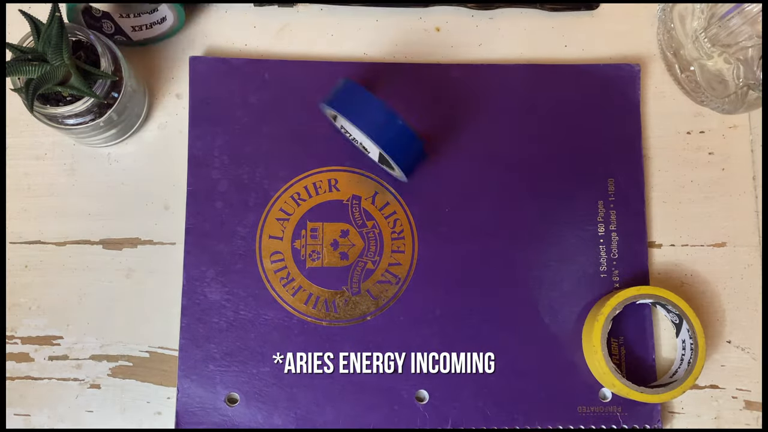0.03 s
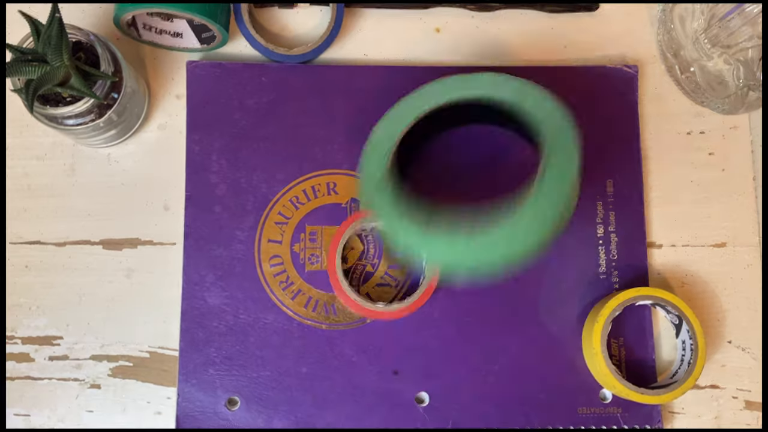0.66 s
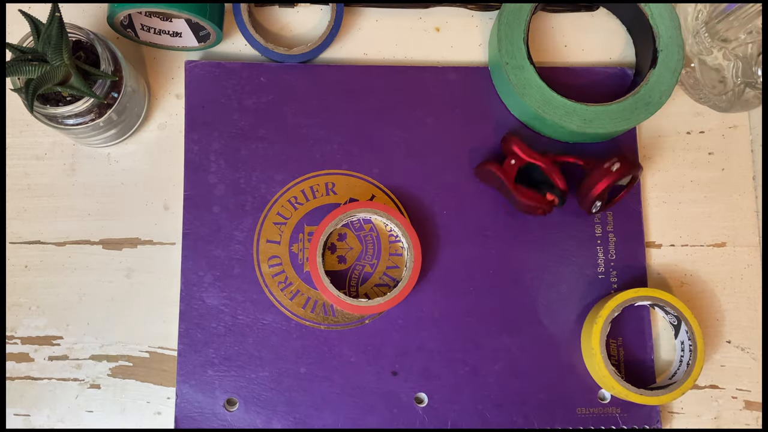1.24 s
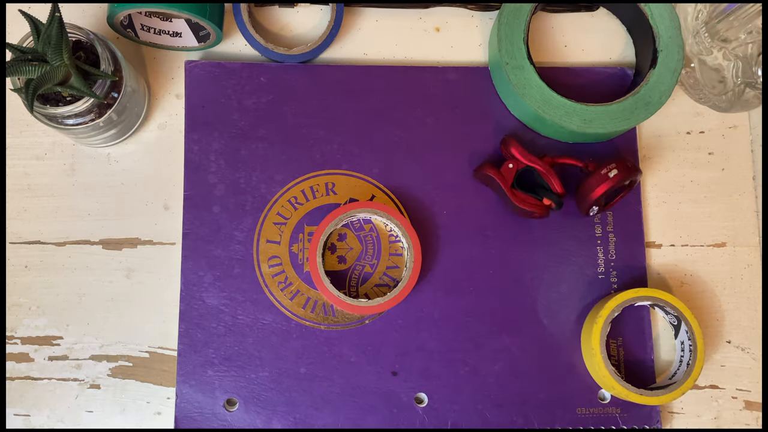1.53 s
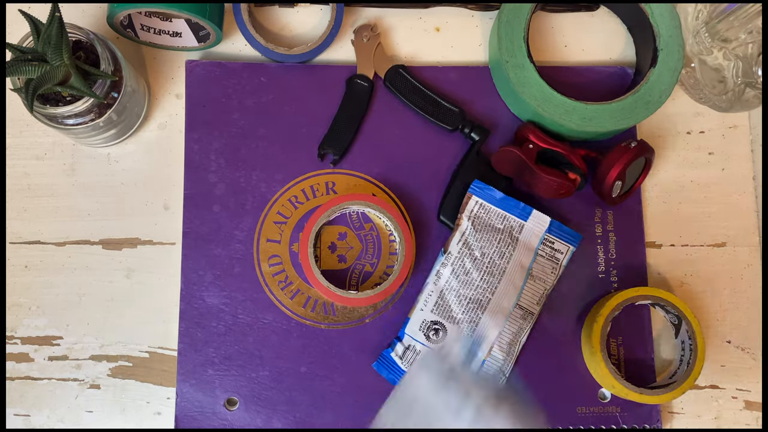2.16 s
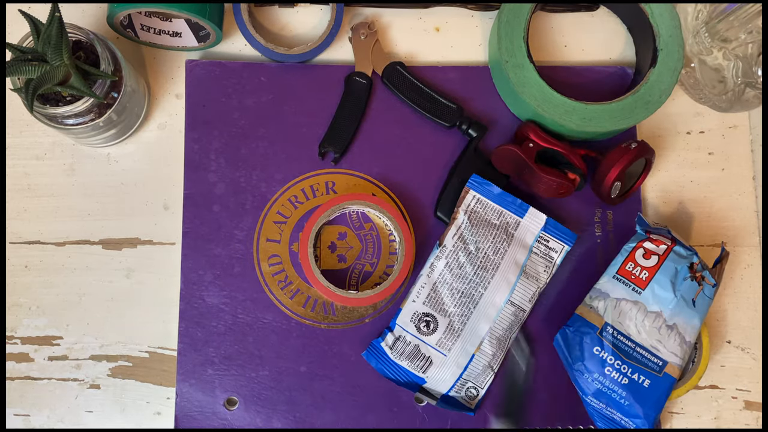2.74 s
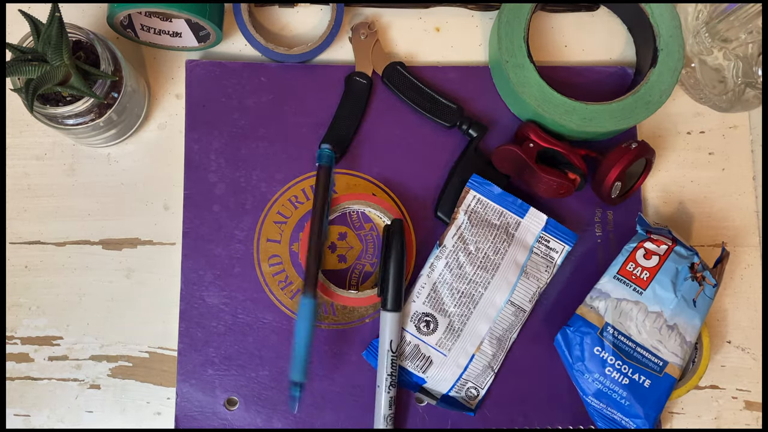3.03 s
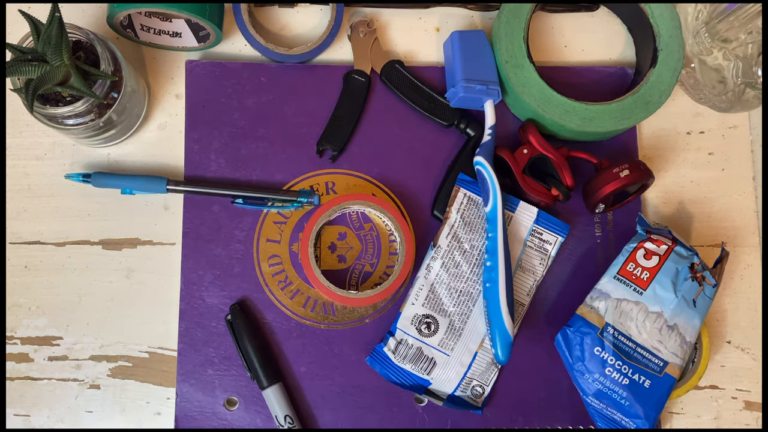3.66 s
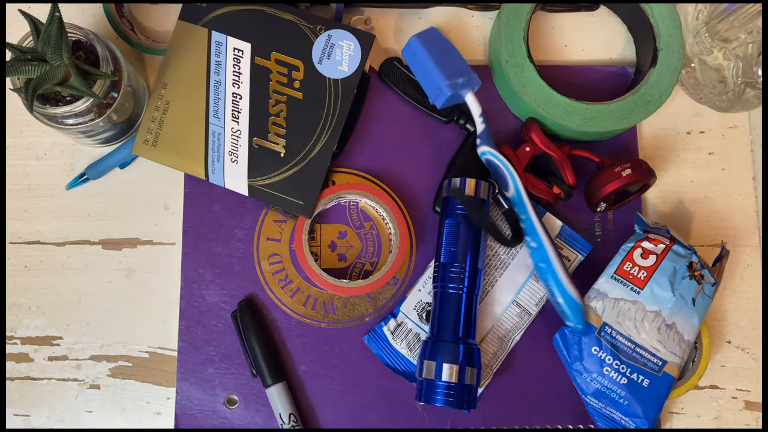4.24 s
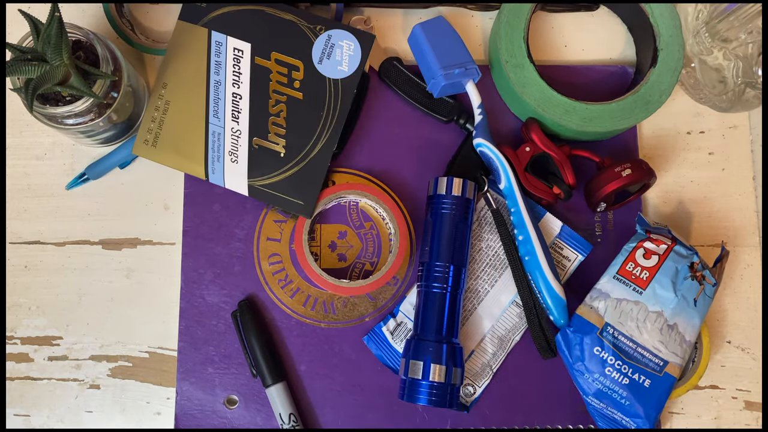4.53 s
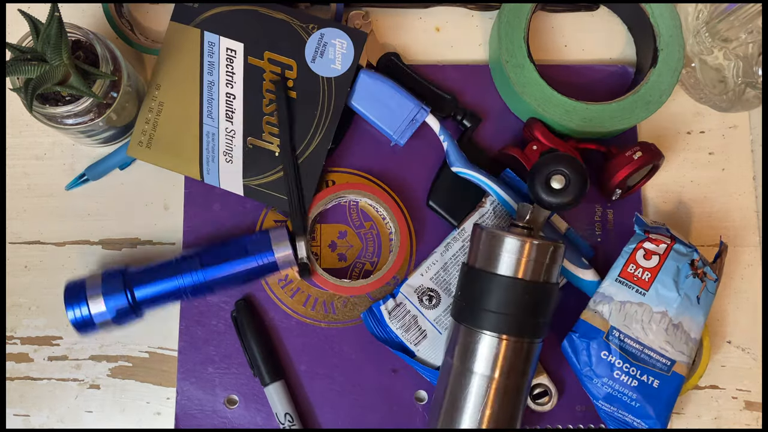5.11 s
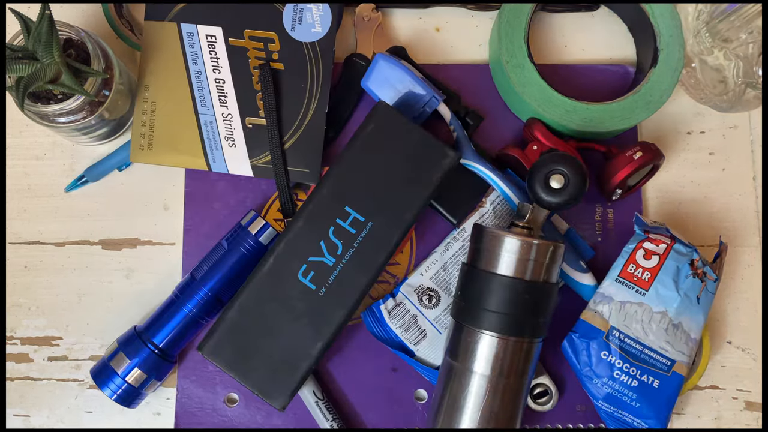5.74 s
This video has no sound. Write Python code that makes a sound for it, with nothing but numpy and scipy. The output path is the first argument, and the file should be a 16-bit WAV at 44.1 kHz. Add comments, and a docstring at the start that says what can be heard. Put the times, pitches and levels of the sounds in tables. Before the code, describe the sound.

Small objects are tossed onto a notebook on a wooden table, two or three each second. Tape rolls thump and bounce first, then a clip clatters, pliers clink and snack packets land with a crinkly slap. Pens click lightly, a flashlight clacks, a steel flask clinks and a box knocks down last. The microphone is close above the table in a small, quiet room.

```python
"""Small objects tossed onto a table

Tape rolls, a clip, pliers, snack packets, pens, a torch, a flask and boxes land one by one on a notebook
on a wooden table. Each landing thumps the tabletop and gives a short clatter, coloured by wood and
object. The object then bounces and rubs to rest; steel parts ring. Two microphone ports hear it from
just above, in a small quiet room."""
import sys
import numpy as np
from scipy import signal
from scipy.fft import rfft, irfft
from scipy.io import wavfile
from scipy.ndimage import uniform_filter1d

SR = 44100
rng = np.random.default_rng(int(sys.argv[2]) if len(sys.argv) > 2 else 0)


def persist_wave(psi):
    """Save psi, clipped to +-1, as 16-bit WAV."""
    counts = np.round(np.clip(psi, -1, 1) * 32767).astype(np.int16)
    wavfile.write(sys.argv[1], SR, np.atleast_2d(counts).T)


N = 254851
LEAD = int(.06 * SR)   # samples ahead of an event's peak
AGE_S = (np.arange(6 * LEAD) - LEAD) / SR

# Each row: time in s, clatter decay in s, levels in dB of thump, knock, clack, tick, rubbing and
# crackle, settling decay in s.
LANDINGS = [ (0.28, 0.0089, -16.5, -19, -30, -34, -68, -54, 0.17),
            (0.665, 0.01, -11.5, -21.5, -32.5, -43.5, -44, -58, 0.15),
            (0.975, 0.0025, -19, -16, -23.5, -31.5, -44, -56, 0.26),
            (1.263, 0.0085, -20, -14.5, -23.5, -30.5, -44, -47.5, 0.24),
            (1.683, 0.0073, -19, -22.5, -30, -25, -69, -44.5, 0.092),
            (1.919, 0.0094, -15, -23.5, -28.5, -25, -63.5, -31, 0.063),
            (2.217, 0.011, -17, -27, -24, -23, -70, -35, 0.056),
            (2.774, 0.0073, -27, -23, -28.5, -31.5, -46, -48.5, 0.054),
            (3.058, 0.0033, -34.5, -25.5, -26, -29, -52, -117.5, 0.026),
            (3.3, 0.009, -24.5, -31.5, -23.5, -28, -44.5, -46, 0.12),
            (3.641, 0.015, -33, -39, -40, -47, -47.5, -45, 0.05),
            (3.912, 0.0067, -32.5, -26.5, -24, -34, -66, -57.5, 0.047),
            (4.175, 0.0048, -26.5, -17, -20.5, -22, -38, -29.5, 0.052),
            (4.761, 0.0037, -27, -24, -17, -26.5, -43, -60, 0.21),
            (5.264, 0.0083, -14, -15, -32, -36, -50.5, -62.5, 0.15), ]
# Higher resonances of the table. Each row: frequency in Hz, lift in dB.
WOOD_RESONANCES = [(450, 5), (625, 4.5), (745, 6), (935, 6.5), (1260, -1), (1420, 2), (1590, -2.5)]
WOOD_Q = 4
# Knock, clack and tick bands. Each row: low edge in Hz, high edge in Hz.
BAND_EDGES_HZ = [(345, 1795), (1750, 5770), (6200, 13300)]
BANDS = [signal.butter(order, edges_hz, "band", fs=SR, output="sos")
         for order, edges_hz in zip((5, 3, 3), BAND_EDGES_HZ)]


def contacts():
    """Yield each landing and bounce: time and decay in s; deep, upper, knock, clack and tick in dB."""
    # Each row: time in s, clatter decay in s, level in dB, kind of touch.
    bounces = [ (0.003, 0.003, -31.5, "thud"), (0.313, 0.0049, -29.5, "knock"),
               (0.354, 0.0032, -38, "knock"), (0.412, 0.021, -32, "knock"), (0.43, 0.005, -17, "knock"),
               (0.496, 0.014, -45.5, "knock"), (0.656, 0.0013, -30, "thud"), (0.688, 0.0083, -21, "thud"),
               (0.779, 0.01, -24.5, "knock"), (0.796, 0.01, -29, "knock"), (0.846, 0.005, -26, "knock"),
               (0.86, 0.016, -30.5, "knock"), (0.896, 0.0043, -33.5, "knock"), (0.96, 0.011, -37, "clack"),
               (0.996, 0.004, -32, "rattle"), (1.033, 0.017, -27, "clack"), (1.131, 0.0075, -28.5, "clack"),
               (1.168, 0.013, -25.5, "clack"), (1.272, 0.022, -26, "clack"), (1.301, 0.011, -30, "rattle"),
               (1.359, 0.0088, -34, "rattle"), (1.412, 0.0048, -33, "thud"), (1.457, 0.0076, -37, "clack"),
               (1.697, 0.0025, -23.5, "click"), (1.712, 0.028, -32.5, "rattle"),
               (1.766, 0.0044, -30, "rattle"), (1.953, 0.027, -34, "rattle"), (2.082, 0.017, -36, "click"),
               (2.15, 0.0028, -30.5, "click"), (2.204, 0.0048, -21.5, "click"),
               (2.225, 0.0013, -14.5, "click"), (2.292, 0.021, -26, "crease"),
               (2.422, 0.006, -37.5, "crease"), (2.525, 0.037, -42, "thud"),
               (2.545, 0.0013, -39.5, "crease"), (2.665, 0.0097, -54.5, "crease"),
               (2.683, 0.0022, -40.5, "crease"), (2.718, 0.0049, -46.5, "crease"),
               (2.737, 0.0017, -43, "crease"), (2.787, 0.0011, -35, "click"), (2.84, 0.0027, -25, "click"),
               (2.867, 0.0006, -30, "click"), (2.891, 0.013, -42, "clack"), (3.047, 0.0018, -28, "click"),
               (3.198, 0.0011, -35, "clack"), (3.235, 0.0029, -44, "rattle"),
               (3.255, 0.006, -42.5, "clack"), (3.358, 0.0061, -32, "rattle"),
               (3.372, 0.0044, -29, "clack"), (3.392, 0.0017, -36.5, "clack"),
               (3.432, 0.00052, -24, "rattle"), (3.453, 0.0023, -39.5, "clack"),
               (3.647, 0.0063, -29.5, "thud"), (3.958, 0.0023, -28.5, "rattle"),
               (3.982, 0.022, -31, "clack"), (3.989, 0.0012, -19.5, "click"), (4.202, 0.013, -29, "rattle"),
               (4.253, 0.0014, -26, "click"), (4.307, 0.0036, -38, "click"),
               (4.362, 0.00096, -31.5, "crease"), (4.377, 0.0028, -33.5, "click"),
               (4.674, 0.0048, -30.5, "click"), (4.784, 0.028, -35, "rattle"),
               (4.814, 0.00034, -16, "click"), (4.888, 0.0019, -23.5, "crease"),
               (4.901, 0.016, -30, "knock"), (4.912, 0.003, -15.5, "knock"), (4.98, 0.0078, -38, "knock"),
               (5.132, 0.0099, -25, "knock"), (5.155, 0.0061, -14.5, "knock"),
               (5.182, 0.0011, -15, "knock"), (5.296, 0.017, -38, "rattle"), (5.334, 0.0022, -23, "knock"),
               (5.334, 0.0036, -25.5, "thud"), (5.42, 0.0025, -27, "knock"), ]
    # Per kind of touch: thump, knock, clack and tick in dB relative to the bounce.
    touches = { "thud": (-0.5, -7.5, -16, -31.5), "knock": (-12.5, 1, -14.5, -36),
               "clack": (-7.5, 0, -2, -21), "rattle": (-2.5, -2, -3, -5.5),
               "crease": (-30, -10.5, -1.5, -18.5), "click": (-31, -13.5, -0.5, -5), }

    def push_db(decay_s, plain_tap_s=.0064):
        """Longer clatters push the table harder."""
        return 10 * np.log10(decay_s / plain_tap_s)

    for time_s, decay_s, thump_db, knock_db, clack_db, tick_db, *_ in LANDINGS:
        upper_db = knock_db + push_db(decay_s) - 5.5
        yield time_s, decay_s, thump_db, upper_db, knock_db, clack_db, tick_db
    for time_s, decay_s, level_db, touch in bounces:
        thump_db, *clatter_db = level_db + np.array(touches[touch])
        deep_db = thump_db + push_db(decay_s)
        upper_db = deep_db - 2.5
        yield time_s, decay_s, deep_db, upper_db, *clatter_db


def clatter(ripple_db=2, grain_db=4, blur_db=(-16, -15, -17), room_db=-39.5, room_t60_s=.3):
    """Each contact is a grainy run of tiny impacts, coloured by wood and object, with a faint room tail."""
    # Object in play. Each row: start in s, hollow resonances and dips as (frequency in Hz, lift in dB).
    objects = [ (0, [(920, 5.5)]), (.38, [(930, 9.5), (1650, 5)]), (.6, [(920, 2)]), (.95, [(1400, 5.5)]),
               (1.15, [(1410, 12.5), (2490, 15)]), (1.22, [(440, 9), (2035, 2.5)]), (1.6, [(2050, 13)]),
               (1.85, [(4400, 3.5)]), (2.65, [(630, 7)]), (3.0, [(2400, 7)]), (3.25, [(2040, 3.5)]),
               (3.6, [(490, 10), (5350, 21)]), (3.85, [(1420, 8.5)]), (4.1, []), (4.6, [(5150, 8)]),
               (4.74, [(2280, 10)]), (4.8, [(5780, 26.5)]), (4.87, [(480, -7), (1000, 3), (1500, 5.5)]), ]
    out = np.zeros((2, N))
    hz = np.linspace(0, SR / 2, len(AGE_S) // 2 + 1)
    octaves = np.log2(np.clip(hz / 1000, 1, 6))
    # dense small modes of each object
    ripples = [from_db(ripple_db * wobble(len(hz), span=18)) for _ in objects]
    tail = from_db(room_db) * swell(.0013, room_t60_s / np.log(1000))
    for time_s, decay_s, _, _, knock_db, clack_db, tick_db in contacts():
        current = max(sum(start_s <= time_s for start_s, _ in objects) - 1, 0)
        db_per_octave = .27 * (tick_db - knock_db) - 2.5   # soft contacts lose treble
        colour = ripples[current] * from_db(db_per_octave * octaves)
        noise = irfft(rfft(stereo_noise(len(AGE_S), spread=.25)) * colour)
        pulse = swell(.43 * decay_s, decay_s)
        grains = match_energy(pulse * from_db(grain_db * wobble(len(AGE_S), span=20)), pulse)
        weight = np.sqrt(decay_s / .003)
        blur = weight * swell(.0015, .017)
        levels_db = (knock_db, clack_db, tick_db)
        for band, db, soft_db, resonances in zip(BANDS, levels_db, blur_db, (WOOD_RESONANCES, [], [])):
            direct = np.hypot(grains, from_db(soft_db) * blur)
            wood = resonate(np.hypot(direct, weight * tail) * noise, resonances, WOOD_Q)
            body = resonate(wood, objects[current][1], base_q=2.3)
            add(out, from_db(db) * match_energy(signal.sosfilt(band, body), direct), time_s)
    return out


def thumps(lag_s=.004):
    """The tabletop bends just after each contact; a blow on one mode's antinode leaves it booming."""
    # Two groups of bending modes. Each row: frequency in Hz, relative level in dB.
    deep_modes = [(52, -13), (103, -1.5), (135, 4.5), (160, 1)]
    upper_modes = [(203, 6.5), (235, 8), (278, 4.5), (315, -4)]
    # Each row: time in s, frequency in Hz, level in dB. The lowest is the table swaying on its legs.
    booms = [ (0.425, 237.7, -32.5), (0.777, 241.5, -26), (0.85, 214, -29.5), (1.173, 229, -29),
             (1.277, 229, -17.5), (2.778, 293, -35), (3.063, 230.7, -33.5), (3.367, 153, -29.5),
             (3.661, 54.9, -28.5), (4.181, 216, -32.5), (4.184, 100.8, -22.5), ]
    out = np.zeros(N)
    for time_s, _, deep_db, upper_db, *_ in contacts():
        deep = from_db(deep_db) * bending(deep_modes, rise_s=.0034, decay_s=.014)
        upper = from_db(upper_db) * bending(upper_modes, rise_s=.0035, decay_s=.015)
        add(out, deep + upper, time_s + lag_s)
    for time_s, hz, db in booms:
        add(out, from_db(db) * bending([(hz, 0)], rise_s=.005, decay_s=.02, detune=0), time_s)
    return out


def bending(modes, rise_s, decay_s, detune=.045, spot_db=2, linger_db=-19, linger_s=.06):
    """Table modes swell and die; the spot hit varies their shares, the load their pitch, at random."""
    envelope = swell(rise_s, decay_s) + from_db(linger_db) * swell(rise_s, linger_s)
    wave = np.zeros(len(AGE_S))
    for hz, db in modes:
        shift, phase, spot = rng.standard_normal(3)
        loaded_hz = hz * (1 + detune * shift)
        wave += from_db(db + spot_db * spot) * np.sin(2 * np.pi * loaded_hz * AGE_S + phase)
    return match_energy(wave * envelope, envelope)


def steel_rings(rise_s=.00074):
    """Steel parts, struck or jostled, ring on in thin partials."""
    # Per part, each row: frequency in Hz, relative level in dB, T60 in s.
    steel_modes = { "pliers": [(2060, 7, 0.15), (10060, -14, .05)], "flask": [(8730, 9.5, 0.05),
                   (10270, -0.5, 0.12), (12570, 1.5, 0.063)], "flask clip": [(5800, 3.5, 0.01)],
                   "trinket": [(5370, 2.5, 0.066), (5560, 1, .06)], }
    # Each row: time in s, level in dB, part.
    strikes = [(1.23, -41.5, "pliers"), (1.676, -37.5, "pliers"), (1.699, -29.5, "pliers"),
               (1.729, -36, "pliers"), (1.764, -45, "pliers"), (3.64, -34, "trinket"),
               (3.702, -46.5, "trinket"), (4.509, -70, "flask"), (4.673, -50.5, "flask"),
               (4.759, -39.5, "flask"), (4.815, -59, "flask"), (4.815, -26, "flask clip")]
    out = np.zeros(N)
    for time_s, db, part in strikes:
        for hz, mode_db, t60_s in steel_modes[part]:
            wave = np.sin(2 * np.pi * (hz * AGE_S + rng.random()))
            add(out, from_db(db + mode_db) * wave * swell(rise_s, t60_s / np.log(1000)), time_s)
    return out


def settling(clump_db=3.5, snap_db=4.5, tick_db=-4):
    """Surfaces catch and slip: uneven rubbing rumbles through the table, tiny snaps come in clumps."""
    rubbing, crackle = friction_envelopes()
    flicker_db = clump_db * wobble(N, span=300)
    rub = resonate(stereo_noise(N, spread=.61) * from_db(flicker_db), WOOD_RESONANCES, WOOD_Q)
    snaps = stereo_noise(N, spread=.025) * from_db(flicker_db + snap_db * wobble(N, span=30))
    rumble_band = signal.butter(2, (120, 270), "band", fs=SR, output="sos")
    forces = (rub, rub, snaps, snaps)
    gains = (rubbing, rubbing, crackle, crackle * from_db(tick_db))
    layers = [signal.sosfilt(band, force) for band, force in zip([rumble_band] + BANDS, forces)]
    return sum(gain * layer / layer.std() for layer, gain in zip(layers, gains))


def friction_envelopes(rise_s=.025):
    """Rubbing and crackle build after each landing and die as the object rests; hands add faint rustles."""
    # Hands fetching the next object. Each row: time in s, level in dB.
    handling = [(0.016, -54.5), (2.575, -56.5), (2.99, -58.5), (3.601, -57), (3.814, -61), (5.752, -57.5)]
    clock_s = np.arange(N) / SR
    power = np.zeros((2, N))
    for time_s, db in handling:
        add(power, np.square(from_db(db) * swell(.01, .016)), time_s)
    for time_s, *_, rub_db, crackle_db, decay_s in LANDINGS:
        age_s = np.maximum(clock_s - time_s, 0)
        motion = (1 - np.exp(-age_s / rise_s)) * np.exp(-age_s / decay_s)
        power += np.square(np.outer(from_db([rub_db, crackle_db]), motion))
    return np.sqrt(power)


def room_tone(level_db=-62.5):
    """Faint steady air, mostly bass."""
    # Each row: frequency in Hz, relative spectral density in dB.
    air_spectrum = [(30, 6), (130, 4), (400, -34)]
    air = irfft(rfft(stereo_noise(N, spread=.096)) * from_db(over_bins(air_spectrum)), N)
    return from_db(level_db) * air / air.std()


def from_db(db):
    """Decibels to gain."""
    return 10 ** (np.asarray(db) / 20)


def over_bins(points):
    """Interpolate (Hz, value) points over the FFT bins on a log axis."""
    hz, value = np.transpose(points)
    bins_hz = np.maximum(np.arange(N // 2 + 1) * SR / N, 1)
    return np.interp(np.log(bins_hz), np.log(hz), value)


def add(track, sound, time_s):
    """Mix in a sound with its age zero at time_s."""
    start = round(time_s * SR) - LEAD
    first, end = max(start, 0), min(start + len(AGE_S), N)
    track[..., first:end] += sound[..., first - start:end - start]


def swell(rise_s, decay_s):
    """Exponential rise to 1 at age zero, then exponential decay."""
    return np.exp(-np.minimum(np.where(AGE_S < 0, -AGE_S / rise_s, AGE_S / decay_s), 30))


def match_energy(sound, envelope):
    """Scale a sound to the energy of an envelope."""
    return sound * np.sqrt(np.mean(envelope ** 2) / np.mean(sound ** 2))


def resonate(sound, resonances, base_q):
    """Apply (Hz, dB) peaks and dips; stronger ones are narrower."""
    for hz, lift_db in resonances:
        b, a = signal.iirpeak(hz, base_q + abs(lift_db), fs=SR)
        sound = sound + (from_db(lift_db) - 1) * signal.lfilter(b, a, sound)
    return sound


def stereo_noise(length, spread):
    """White mid noise plus side noise scaled by spread."""
    mid, side = rng.standard_normal((2, length))
    return mid + spread * side * [[1], [-1]]


def wobble(length, span):
    """Smooth random curve of unit deviation, changing about every span points."""
    slow = uniform_filter1d(uniform_filter1d(rng.standard_normal(length), span), span)
    return slow / slow.std()


def scene():
    """Stereo sum of the tossed objects, the table and the room."""
    return clatter() + settling() + thumps() + steel_rings() + room_tone()


def record(dry):
    """The right port hears more lows and lags in the treble; peaks are rounded and the top is cut."""
    # Each row: frequency in Hz, left minus right in dB.
    balance_db = [(90, -2.7), (600, -6.5), (1100, -1.8), (9000, 0)]
    # Each row: frequency in Hz, lag of the right port in radians.
    lag_rad = [(400, 0), (860, .4), (5200, .5), (7350, np.pi), (13700, 3 * np.pi), (16000, 4 * np.pi)]
    ceiling, cutoff_hz = .65, 16000
    left = from_db(over_bins(balance_db))
    right = np.exp(-1j * over_bins(lag_rad))
    ports = np.array([left, right]) * np.sqrt(2 / (1 + left ** 2))   # constant total power
    heard = irfft(rfft(dry) * ports, N)
    rounded = ceiling * np.tanh(heard / ceiling)
    return signal.sosfilt(signal.ellip(10, .3, 80, cutoff_hz, fs=SR, output="sos"), rounded)


dry = scene()
out = record(dry)
persist_wave(out)
```